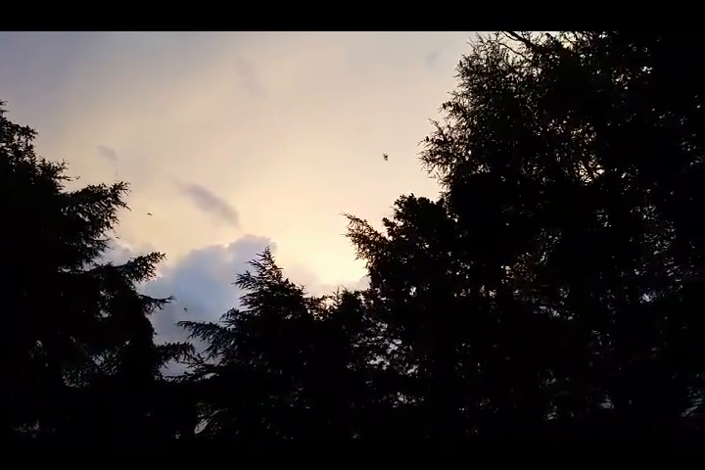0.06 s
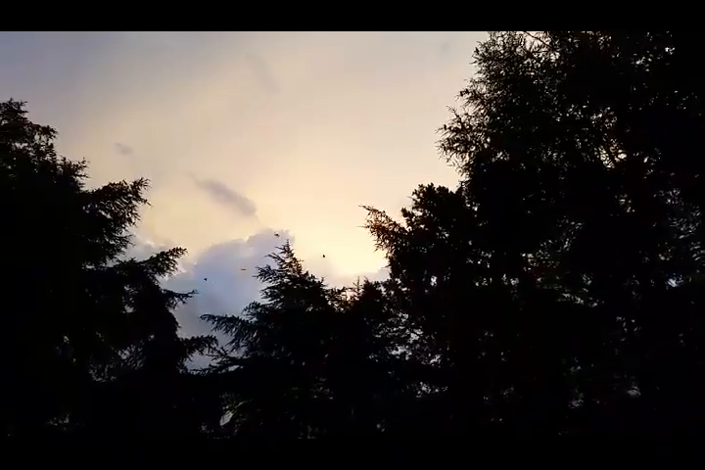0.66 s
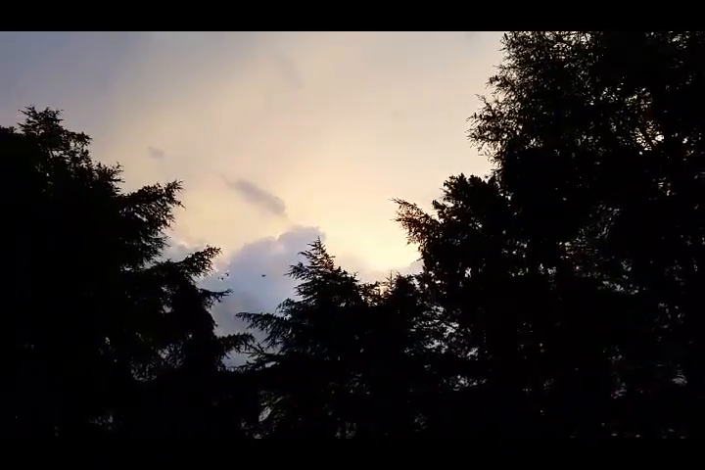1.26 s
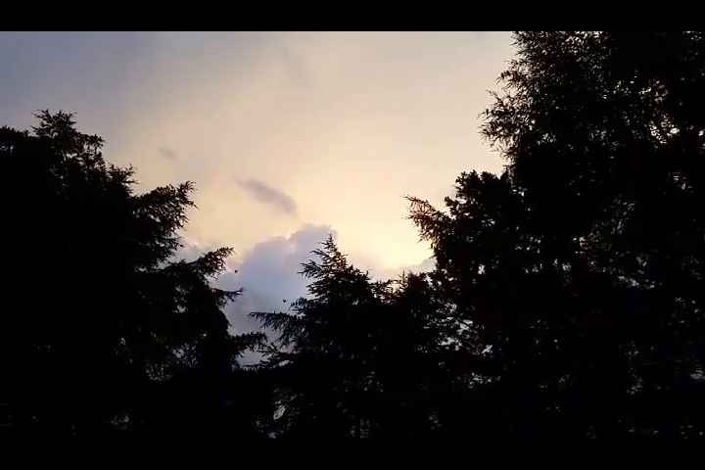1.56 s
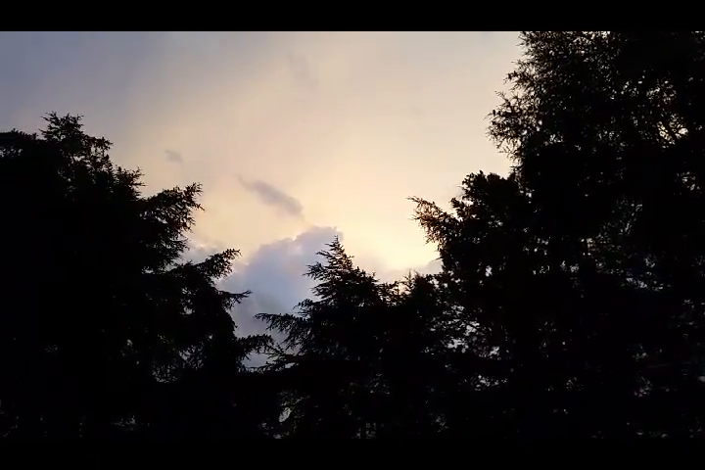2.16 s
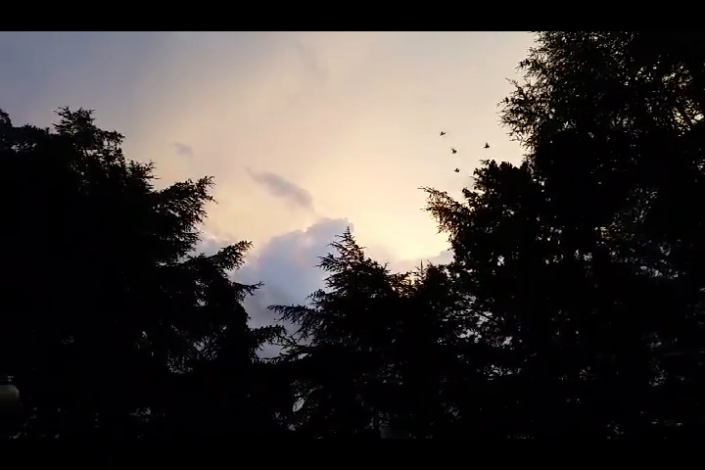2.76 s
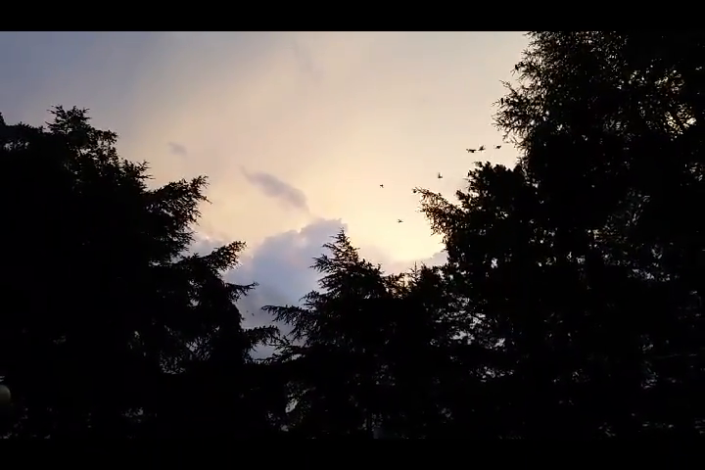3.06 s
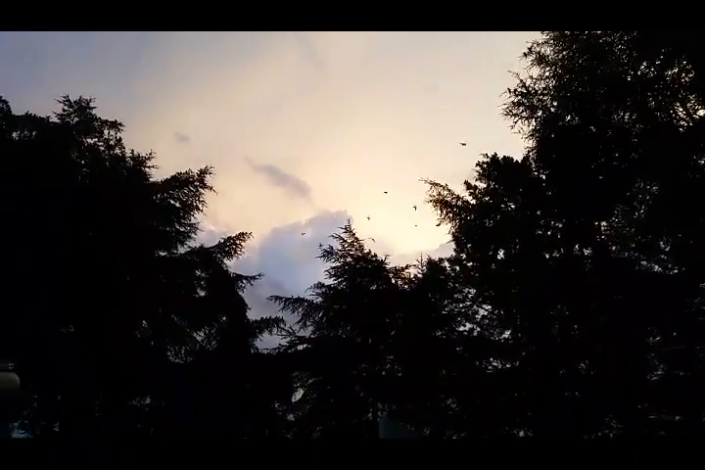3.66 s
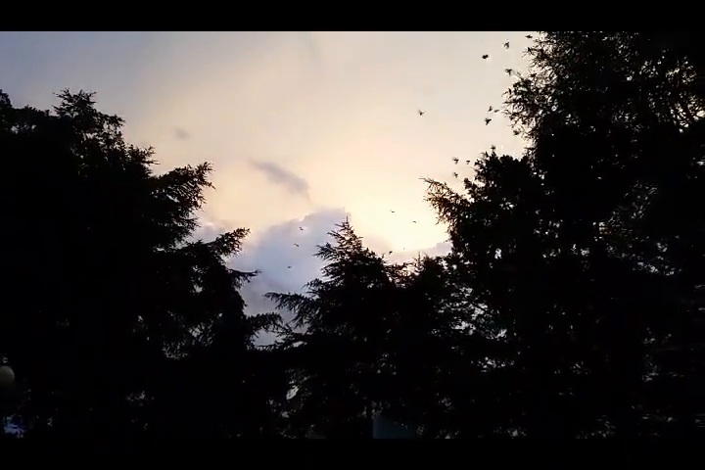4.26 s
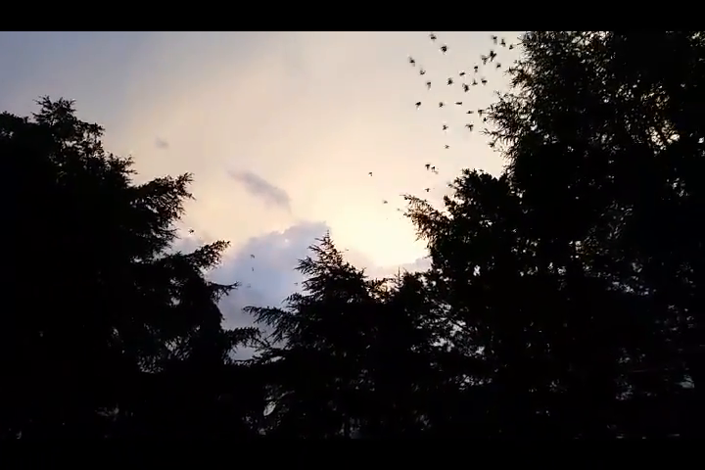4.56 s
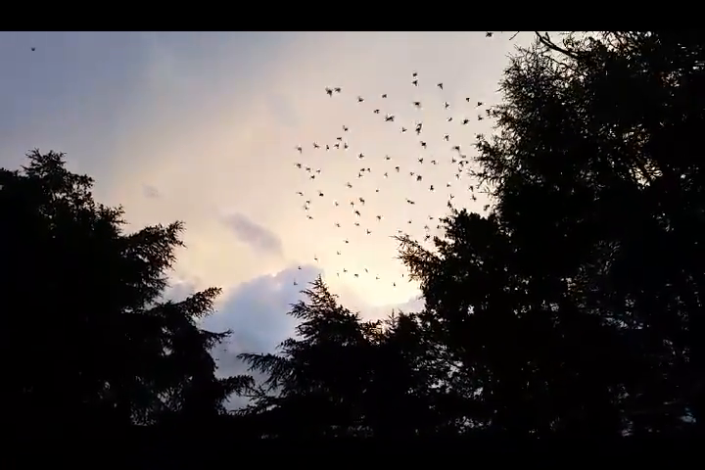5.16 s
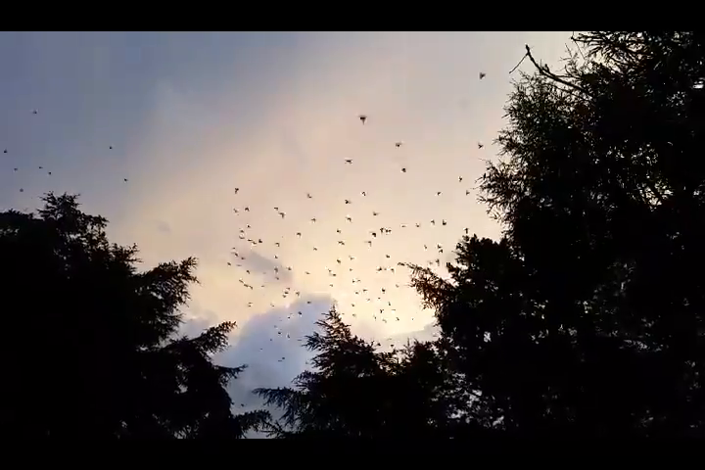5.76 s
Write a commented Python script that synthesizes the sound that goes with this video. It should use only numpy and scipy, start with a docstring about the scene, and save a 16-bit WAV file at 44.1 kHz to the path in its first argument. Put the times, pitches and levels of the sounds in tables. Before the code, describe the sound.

A dense, steady din of roosting starlings, thin high whistles standing out, over the soft low rumble of far traffic.

```python
"""Tall conifers at dusk, holding a huge starling roost. Thousands of rasps, squeaks and thin whistles
merge into one din, scattered by the branches, that eases and builds with the flock's excitement.
A few nearer birds, mostly on the left, stand out with sliding, held, arched and slurred whistles.
Far behind, traffic rumbles, one engine slowly gains speed, and a vehicle's drone drops as it passes."""
import sys
import numpy as np
from scipy import signal
from scipy.fft import rfft, irfft
from scipy.io import wavfile

SR = 44100
rng = np.random.default_rng(int(sys.argv[2]) if len(sys.argv) > 2 else 0)


def pcm_store(signal):
    """Save signal as 16-bit PCM."""
    levels = np.round(np.clip(np.atleast_2d(signal), -1, 1) * 32767)
    wavfile.write(sys.argv[1], SR, levels.astype(np.int16).T)


N = 264600
TIME = np.arange(N) / SR
PORT_LAG_S = 18 / SR  # between the two microphone ports


def undb(db):
    """Decibels to gain."""
    return 10 ** (np.asarray(db) / 20)


def unit(x):
    """Scale to rms 1."""
    return x / np.sqrt(np.mean(x ** 2))


def curves(table):
    """Interpolate each column linearly over the first, t/s."""
    t_s, *columns = np.transpose(table)
    return [np.interp(TIME, t_s, column) for column in columns]


def waver(rate_hz):
    """Random wobble, rms 1, with rate_hz new values a second."""
    return unit(np.interp(TIME * rate_hz, np.arange(16384), rng.standard_normal(16384)))


def colour(x, spectrum, amount=1):
    """Filter by (f/Hz, level/dB) points; rolls off beyond the ends at amount 1 only."""
    hz, db = np.transpose(spectrum)
    log_f = np.log(np.fft.rfftfreq(N, 1 / SR) + 1)
    beyond = np.abs(log_f - np.clip(log_f, np.log(hz[0]), np.log(hz[-1])))
    gain_db = amount * np.interp(log_f, np.log(hz), db) - 20 * beyond * (amount == 1)
    return irfft(rfft(x) * undb(gain_db), N)


def add(out, x, start_s, pan_db, lag_s):
    """Mix in a call; pan_db is left minus right, lag_s delays the right."""
    for channel, side in enumerate((1, -1)):
        i = int(start_s * SR) + channel * int(round(lag_s * SR))
        lo, hi = max(i, 0), min(i + len(x), N)
        if hi > lo:
            out[channel, lo:hi] += x[lo - i:hi - i] * np.sqrt(2 / (1 + undb(-2 * side * pan_db)))


def call(length_s, contour_hz, warble_hz, trill_hz, rasp):
    """Syrinx note: a parabola through three pitches, unsteadily warbled; rasp chops it into pulses."""
    u = np.linspace(0, 1, max(int(length_s * SR), 64))
    first, middle, last = contour_hz
    hz = middle + (last - first) * (u - .5) + 2 * (first + last - 2 * middle) * (u - .5) ** 2
    wander = np.interp(u, np.linspace(0, 1, 12), rng.standard_normal(12))
    cycle = np.cumsum(trill_hz * (1 + .212 * wander)) / SR + rng.random()
    hz += warble_hz * (np.sin(2 * np.pi * cycle) + .5 * wander)
    gate = 1 - rasp + rasp * np.sqrt(2) * np.cos(np.pi * cycle) ** 4
    swell = np.sqrt(np.abs(np.sin(np.pi * u ** 1.06)))
    return np.sqrt(2) * swell * gate * np.sin(2 * np.pi * np.cumsum(hz) / SR)


def crowd(pitches_hz, length_s, slide, warble_hz, trill_hz, rasp, spread_db, pan_db):
    """One call per pitch, each with its own perch, length, slide and level."""
    out, count = np.zeros((2, N)), len(pitches_hz)
    starts_s = (np.arange(count) + rng.random(count)) / count * (N / SR + length_s) - length_s
    deviations = np.clip(rng.standard_normal((count, 6)), -2, 2)
    for start_s, hz, (stretch, head, tail, trill, near, side) in zip(starts_s, pitches_hz, deviations):
        contour_hz = hz * np.exp(slide * np.array([head, 0, tail]))
        duration_s = length_s * np.exp(.4 * stretch)
        note = call(duration_s, contour_hz, warble_hz, trill_hz * np.exp(.4 * trill), rasp)
        add(out, note * undb(spread_db * near), start_s, pan_db + 3 * side, PORT_LAG_S * (1 + .12 * side))
    return out


def trees(x, t60_s, wet_db):
    """Branches scatter calls into a short tail; perches differ, so each block gets a new one."""
    block = 8192
    t = np.arange(2 * block) / SR
    fade = np.exp(-np.log(1000) * t / t60_s)
    fade /= np.linalg.norm(fade)
    padded = np.pad(x, ((0, 0), (2 * block, block)), mode="reflect")
    wet = np.zeros((2, N + 6 * block))
    for i in range(0, N + 2 * block, block // 2):
        piece = padded[:, i:i + block] * np.sqrt(np.hanning(block))
        tail = fade * rng.standard_normal((2, len(t)))
        wet[:, i:i + 3 * block - 1] += signal.fftconvolve(piece, tail, axes=1)
    return (x + undb(wet_db) * wet[:, 2 * block:2 * block + N]) / np.hypot(1, undb(wet_db))


def din(calls, spectrum, far_db):
    """Calls over countless farther ones, which blur into a hiss of the same colour."""
    return unit(colour(unit(calls) + undb(far_db) * rng.standard_normal((2, N)), spectrum))


def flock():
    """Low chatter, squeaks, thin whistles, short chips and high sizzle, all following the excitement."""
    # excitement: t/s, chatter level/dB, higher calls' level/dB
    excitement = [(0, -33, -33), (0.17, -34, -34.5), (0.38, -33, -34), (0.56, -32.5, -35.3),
                  (0.72, -34.5, -34.5), (1.5, -34, -34), (1.7, -34, -34.5), (2.15, -34, -35.5),
                  (2.4, -33.5, -35.5), (2.68, -34, -35.5), (3.02, -34.5, -35), (3.2, -36, -36),
                  (3.45, -34.5, -36), (3.75, -36, -36.5), (4.2, -37, -37), (4.7, -37, -37.3),
                  (5.24, -36, -36.5), (5.42, -35.5, -37.5), (5.68, -35.5, -36), (5.83, -34, -36.5),
                  (6, -35.5, -34.5)]
    # call spectra: f/Hz, level/dB
    chatter_spectrum = [(450, -17), (800, -13), (1050, -5.5), (1300, -6.5), (1650, -3), (2000, -4),
                        (2450, -0.5), (2800, -3), (3150, -11), (4000, -10), (5500, -26.5)]
    squeak_spectrum = [(2800, 4.5), (3800, -3), (4900, -1.5), (5600, -3.5), (6600, -1), (8000, 0),
                       (9200, -7.5), (10100, -9.5), (10800, -25), (12500, -39)]
    sizzle_spectrum = [(10000, -14), (11200, -5), (12100, 7), (13200, -3.5), (14500, -26)]
    low_db, high_db = (db - db.mean() for db in curves(excitement))
    chatter = crowd(rng.uniform(1449, 3100, size=3000), length_s=.013, slide=.1518,
                    warble_hz=144, trill_hz=90, rasp=.67, spread_db=-.05, pan_db=3)
    squeaks = crowd(rng.uniform(3200, 10500, size=2000), length_s=.022, slide=.0993,
                    warble_hz=298.5, trill_hz=110, rasp=.77, spread_db=0, pan_db=5)
    whistles = crowd(rng.normal(8250, 370.3, size=650), length_s=.045, slide=.045,
                     warble_hz=110, trill_hz=71.2, rasp=.096, spread_db=-.5, pan_db=18)
    chips = crowd(rng.normal(8300, 280, size=110), length_s=.018, slide=.04,
                  warble_hz=90, trill_hz=130, rasp=.3, spread_db=2.5, pan_db=10)
    sizzle = crowd(rng.uniform(11500, 14000, size=150), length_s=.035, slide=.083,
                   warble_hz=536, trill_hz=220, rasp=.19, spread_db=1.5, pan_db=-.5)
    chatter = din(trees(chatter, t60_s=.89, wet_db=.5), chatter_spectrum, far_db=10)
    squeaks = din(trees(squeaks, t60_s=.51, wet_db=5.5), squeak_spectrum, far_db=4)
    whistles = unit(trees(whistles, t60_s=.74, wet_db=-.5))
    chips = unit(trees(chips, t60_s=.28, wet_db=-5))
    sizzle = din(trees(sizzle, t60_s=.34, wet_db=11), sizzle_spectrum, far_db=-9)
    return (chatter * undb(-33.5 + .95 * low_db)
            + squeaks * undb(-34 + high_db)
            + whistles * undb(-41 + .63 * high_db)
            + chips * undb(-45.5 + .63 * high_db)
            + sizzle * undb(-57.5 + 1.5 * high_db))


def road_noise(spectrum, side_db):
    """Far noise, nearly the same at both ports."""
    mid, side = colour(rng.standard_normal((2, N)), spectrum)
    return unit(mid) + undb(side_db) * unit(side) * np.array([[1], [-1]])


def rumble():
    """Deep, uneven noise of far traffic."""
    # rumble spectrum: f/Hz, level/dB
    spectrum = [(18, -25), (32, -7), (46, -2.5), (58, 2.5), (69, -4), (84, -2), (110, -9), (160, -17)]
    # swells: t/s, level/dB
    swells = [(0, -48), (0.9, -48), (1.3, -49), (2.4, -49.5), (2.85, -45), (3.2, -45.5), (3.6, -47.5),
              (3.82, -43), (4.08, -48), (4.35, -44.5), (4.65, -49.5), (5.17, -39.5), (5.36, -47),
              (5.9, -49.5)]
    db, = curves(swells)
    return road_noise(spectrum, side_db=-10) * undb(db)


def tyres(road_db=-48, vehicle_db=-44, nearest_s=3.8, pass_s=.27):
    """Steady road noise plus one passing vehicle, its gain one over distance."""
    # tyre spectrum: f/Hz, level/dB
    spectrum = [(80, -3.5), (125, 5), (170, -2), (240, -3), (330, -8.5), (450, -12.5), (700, -8.5),
                (1200, -26), (3000, -51)]
    distance = np.hypot(1, (TIME - nearest_s) / pass_s)
    return road_noise(spectrum, side_db=-11.5) * np.hypot(undb(road_db), undb(vehicle_db) / distance)


def hum(hz, db, jitter_rad=.12, waver_db=1.5):
    """One partial of a distant engine; phase and level waver on the air."""
    phase = 2 * np.pi * np.cumsum(hz) / SR + jitter_rad * waver(18)
    return undb(db + waver_db * waver(10)) * np.sin(phase)


def engine():
    """Lowest firing harmonics of a far engine that gains speed, then eases and fades."""
    # engine run: t/s, firing f/Hz, level/dB
    run = [(0, 51, -50.5), (0.85, 54.15, -47.5), (1.4, 55.6, -45.5), (2.3, 58, -49), (2.9, 58.5, -51.5),
           (3.45, 59.46, -52), (3.8, 63.56, -52), (4.2, 60, -58), (6, 56.8, -62)]
    # harmonics 1-3: relative level/dB
    harmonics_db = [-0.5, 2.5, -17]
    firing_hz, level_db = curves(run)
    return sum(hum(k * firing_hz, level_db + db) for k, db in enumerate(harmonics_db, 1))


def drone():
    """A vehicle's tone, dropping in pitch as it passes."""
    # pass-by: t/s, f/Hz, level/dB
    pass_by = [(0, 97, -58), (1.3, 97, -55), (3.3, 96.8, -53.5), (3.92, 91, -43), (4.2, 82.5, -50),
               (4.6, 81.7, -52), (5.15, 81, -45), (5.6, 80.1, -60)]
    return hum(*curves(pass_by))


def hoarse(note, share, width_hz):
    """Unsteady airflow turns a share of the note's power into a noise band about width_hz wide."""
    return note * (np.sqrt(1 - share) + np.sqrt(share) * waver(width_hz)[:len(note)])


def sliding_whistles(out):
    """Hoarse glides, mostly falling."""
    # glides: t/s, length/s, first f/Hz, last f/Hz, level/dB, pan/dB, hoarseness/0-1
    glides = [(0.0, 0.09, 8450, 7950, -31, 20, 0.3), (0.08, 0.073, 7850, 6950, -35.5, 16, .25),
              (0.14, .055, 7000, 7800, -43, 13, .5), (0.676, 0.026, 8300, 7800, -29, 11, .18),
              (0.753, 0.029, 8250, 8000, -35, 11, 0.1), (0.777, .025, 8300, 7800, -37, 11, .18),
              (0.867, 0.085, 5350, 4650, -40.5, 5, .08), (0.95, .1, 4480, 4380, -42, 9, .05),
              (1.04, 0.033, 8650, 7900, -30, 12, .18), (1.088, .02, 7500, 7100, -34, 16, .18),
              (1.115, .05, 8500, 7900, -38, 10, .3), (1.81, 0.102, 7800, 7450, -37, 15, .25),
              (1.984, 0.19, 7650, 6250, -38.5, 9, .4), (2.17, .13, 6350, 7300, -42, 8, .7),
              (2.827, 0.031, 8300, 7900, -32, 10, .15), (3.0, .15, 6000, 7600, -43, 13, .7),
              (5.74, .2, 7300, 6000, -44, 14, 0.8)]
    for start_s, length_s, first_hz, last_hz, db, pan_db, hoarseness in glides:
        note = call(length_s, np.geomspace(first_hz, last_hz, 3), warble_hz=70, trill_hz=100, rasp=.34)
        note = hoarse(note, hoarseness, width_hz=750)
        add(out, undb(db) * note, start_s, pan_db, PORT_LAG_S * np.sign(pan_db))


def high_rasps(out, rise_hz=920):
    """Very high climbing rasps; the hoarser ones warble wider."""
    # rasps: t/s, length/s, f/Hz, level/dB, hoarseness/0-1
    rasps = [(0.07, 0.094, 12500, -51, 0.8), (0.08, 0.24, 13650, -48, .25), (0.767, 0.11, 12500, -49, .55),
             (1.152, 0.49, 12550, -49, 0.7), (1.37, 0.026, 12300, -47, .6), (1.48, .04, 12800, -44, .6),
             (2.25, 0.18, 12800, -52, 0.5), (5.58, .09, 12200, -52, 0.5), (5.868, 0.11, 12230, -45, 0.7)]
    for start_s, length_s, hz, db, hoarseness in rasps:
        contour_hz = hz + rise_hz * np.array([-.5, 0, .5])
        note = call(length_s, contour_hz, warble_hz=750 * hoarseness, trill_hz=380, rasp=.35)
        note = hoarse(note, hoarseness, width_hz=1100)
        add(out, undb(db) * note, start_s, pan_db=0, lag_s=PORT_LAG_S)


def held_whistles(out, sag_hz_per_s=780):
    """Warbling whistles that sag slightly in pitch."""
    # held notes: t/s, length/s, f/Hz, level/dB, pan/dB
    notes = [(0.216, 0.041, 8460, -33, 8), (0.407, 0.15, 8180, -33, 10), (0.513, 0.077, 9200, -36.5, 8),
             (0.578, 0.03, 8320, -28, 8), (0.89, .025, 8630, -30, 9), (2.32, .045, 8280, -31, 12),
             (2.383, 0.17, 8650, -34, 9), (3.201, 0.29, 8140, -34, 13), (3.41, 0.18, 9360, -43.5, 1),
             (3.686, 0.13, 8580, -36, 15), (3.728, 0.11, 8250, -42, -14), (4.301, 0.066, 8320, -27, 18),
             (4.778, 0.083, 8400, -34, 11), (4.98, 0.06, 8830, -37, 5), (5.38, 0.11, 8920, -39, 12),
             (5.585, 0.13, 8200, -35, 9), (5.924, 0.12, 8600, -34.5, 12)]
    for start_s, length_s, hz, db, pan_db in notes:
        contour_hz = hz + sag_hz_per_s * length_s * np.array([.5, 0, -.5])
        note = call(length_s, contour_hz, warble_hz=.0163 * hz, trill_hz=150, rasp=.4)
        note = hoarse(note, share=.22, width_hz=500)
        add(out, undb(db) * note, start_s, pan_db, PORT_LAG_S * np.sign(pan_db))


def squawks(out):
    """Low arched calls, centred."""
    # squawks: t/s, length/s, mid f/Hz, level/dB
    notes = [(1.622, .06, 1650, -45), (1.721, 0.053, 1560, -41), (2.39, .07, 2340, -38),
             (5.328, 0.042, 1780, -43), (5.4, .06, 2600, -41)]
    for start_s, length_s, hz, db in notes:
        note = call(length_s, hz * np.array([.86, 1, .93]), warble_hz=30, trill_hz=66, rasp=.25)
        add(out, undb(db) * note, start_s, pan_db=0, lag_s=0)


def arched_chirps(out, pan_db):
    """Buzzing chirps that rise and fall."""
    # chirps: t/s, length/s, mid f/Hz, level/dB
    chirps = [(1.93, 0.055, 8620, -29.5), (2.787, 0.06, 8520, -30.5)]
    for start_s, length_s, hz, db in chirps:
        note = call(length_s, hz * np.array([.95, 1, .91]), warble_hz=100, trill_hz=141, rasp=.25)
        note = hoarse(note, share=.15, width_hz=700)
        add(out, undb(db) * note, start_s, pan_db, PORT_LAG_S)


def slurred_whistle(out, pan_db, waver_hz=60.8, edge_s=.008):
    """One nearly pure whistle, gliding up and down without a break."""
    # slur: t/s, f/Hz, level/dB
    slur = [(2.528, 7450, -34), (2.555, 7970, -32), (2.567, 8250, -30), (2.588, 8930, -31),
            (2.611, 8300, -34), (2.632, 8480, -30), (2.65, 8270, -34), (2.672, 8680, -27),
            (2.693, 8150, -42), (2.724, 8050, -29)]
    hz, db = curves(slur)
    gate = np.clip(np.minimum(TIME - slur[0][0], slur[-1][0] - TIME) / edge_s, 0, 1)
    phase = 2 * np.pi * np.cumsum(hz + waver_hz * waver(250)) / SR
    add(out, np.sqrt(2) * gate * undb(db) * np.sin(phase), 0, pan_db, PORT_LAG_S)


def near_birds(nearest_pan_db=13):
    """Single calls from the closest branches, with little scatter."""
    out = np.zeros((2, N))
    sliding_whistles(out)
    high_rasps(out)
    held_whistles(out)
    squawks(out)
    arched_chirps(out, nearest_pan_db)
    slurred_whistle(out, nearest_pan_db)
    return trees(out, t60_s=.3, wet_db=-10.5)


def scene():
    """The roost over the traffic."""
    return flock() + rumble() + tyres() + engine() + drone() + near_birds()


def record(dry, top_hz=14650):
    """Each microphone port colours the sound its own way; the top is cut."""
    # port imbalance before scaling: f/Hz, left minus right/dB
    imbalance = [(60, -2.5), (500, 0.5), (1550, -2.5), (1950, 6), (2650, 2), (3100, 0.5), (3800, -1),
                 (4900, -11.5), (6200, -10.5), (7200, -1.5), (8400, 1.5), (10000, -1.5), (12000, -1)]
    left = colour(dry[0], imbalance, amount=.38)
    right = colour(dry[1], imbalance, amount=-.46)
    lowpass = signal.ellip(10, .2, 80, top_hz, fs=SR, output="sos")
    return signal.sosfilt(lowpass, np.array([left, right]))


dry = scene()
out = record(dry)
pcm_store(out)
```